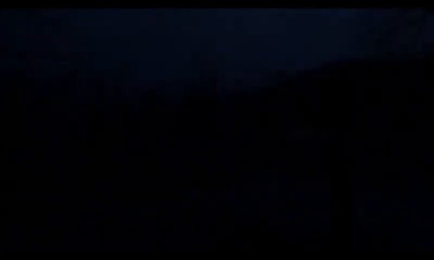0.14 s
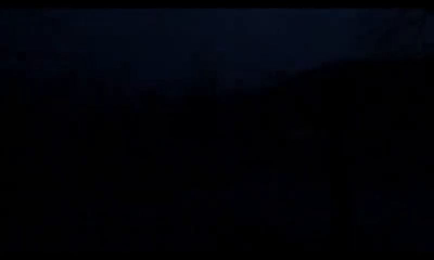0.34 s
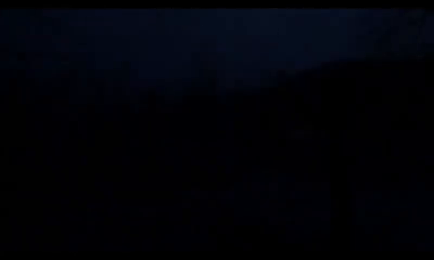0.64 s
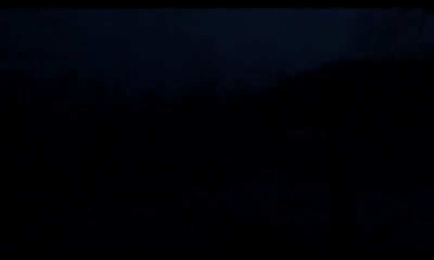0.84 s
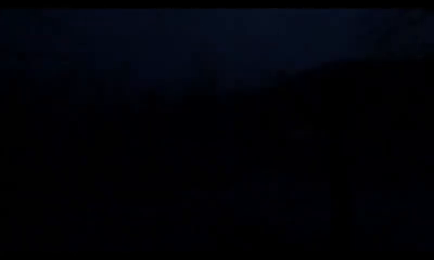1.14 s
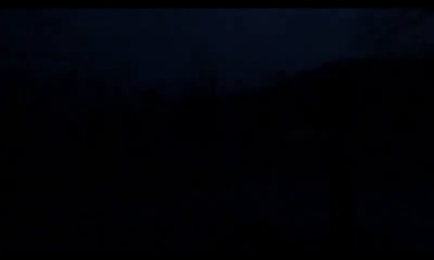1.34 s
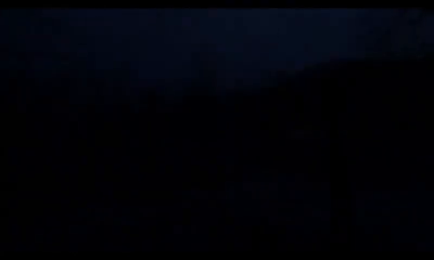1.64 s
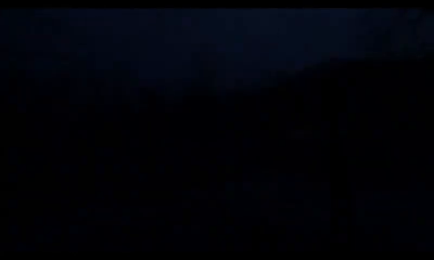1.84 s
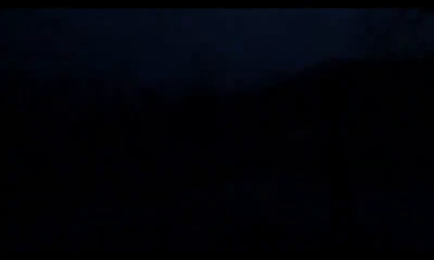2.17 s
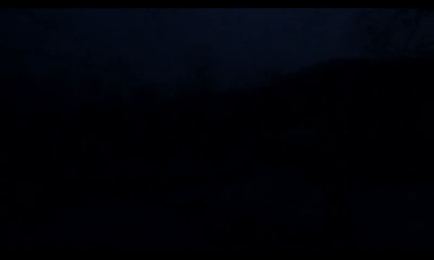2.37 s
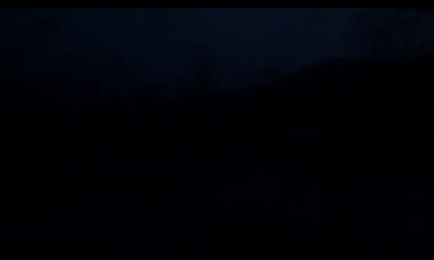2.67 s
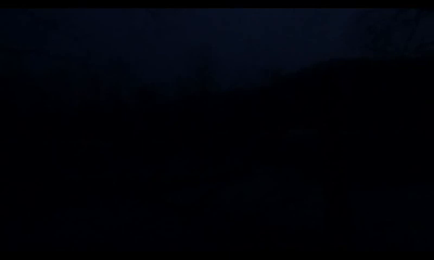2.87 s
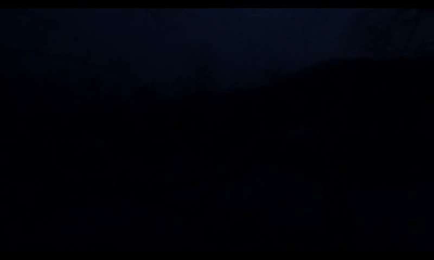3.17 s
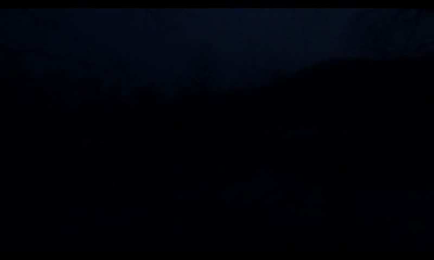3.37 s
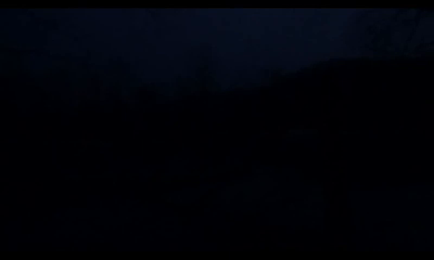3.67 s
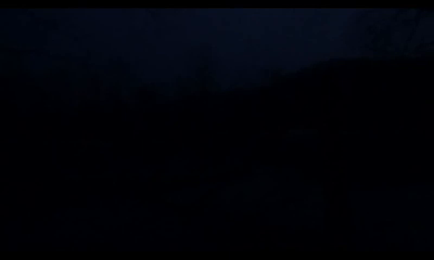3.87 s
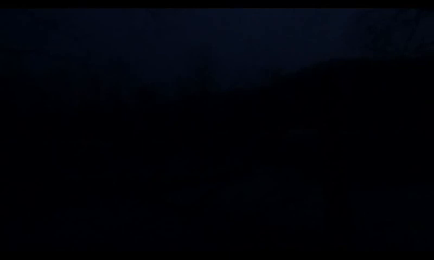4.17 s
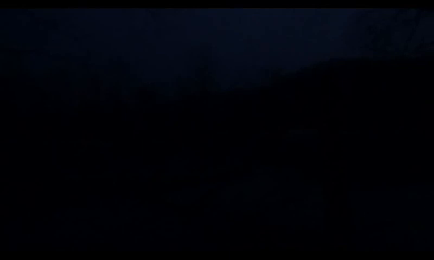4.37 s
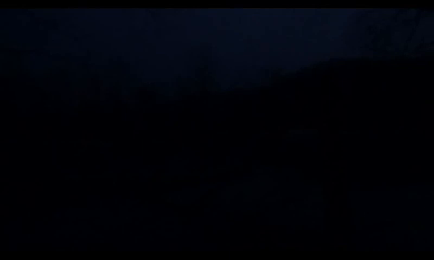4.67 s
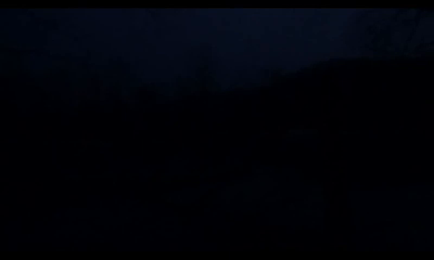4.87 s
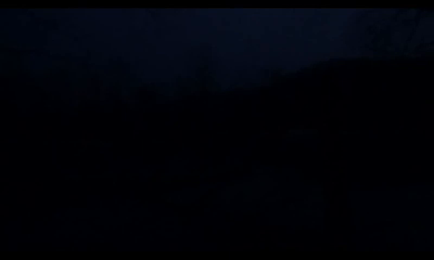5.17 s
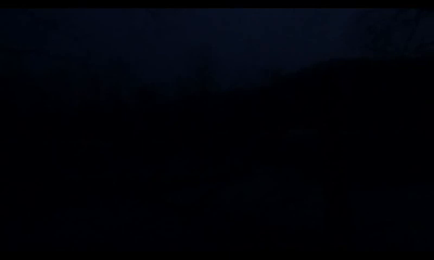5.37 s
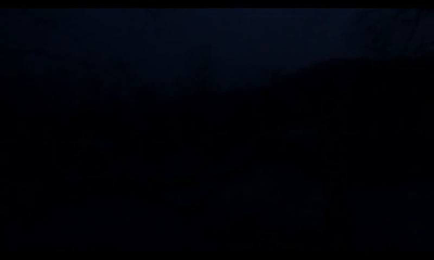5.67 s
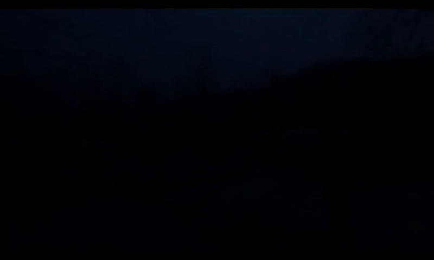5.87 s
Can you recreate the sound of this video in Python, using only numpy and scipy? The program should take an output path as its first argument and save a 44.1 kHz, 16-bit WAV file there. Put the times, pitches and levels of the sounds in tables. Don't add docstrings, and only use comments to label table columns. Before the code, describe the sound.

Dusk woods, close stereo microphone, a soft stream in front. At 0.06 s there is a soft knock, with dry leaves settling over the first half second. From about 0.4 s a loud owl, near and left, scoops into its first hoot; a second follows at 0.85, then a slurred pair from 1.3 to 1.7. After a pause with only water, single hoots come at 2.35 and 2.7, and a last slurred pair begins at 3.2, its end sliding far down until about 4.0 with a small thin afternote. Each hoot is a smooth, nearly pure arch around 470 to 650 Hz, breathy, usually led by a faint rising chirp, with a slight tail off trunks. The far quieter stream sinks under the calls and creeps back; from 4.2 to 6 s it rushes alone, gurgling, with bubbly plops, bright splash ticks and a brief swell near 4.7.

```python
import sys
import numpy as np
from scipy import signal
from scipy.fft import rfft, irfft, next_fast_len
from scipy.io import wavfile
from scipy.ndimage import uniform_filter1d

SR = 44100
rng = np.random.default_rng(int(sys.argv[2]) if len(sys.argv) > 2 else 0)


def pcm_store(signal):
    levels = np.round(np.clip(np.atleast_2d(signal), -1, 1) * 32767)
    wavfile.write(sys.argv[1], SR, levels.astype(np.int16).T)


def level_to_linear(level):
    exponent = np.asarray(level, float) / 20
    return 10 ** exponent


N = 265482

# leaves_foot_s, top_s, back_at_foot_s, top_hz
HOOT_ARCHES = [
    (0.457, 0.561, 0.643, 612),
    (0.838, 0.906, 1.029, 631),
    (1.297, 1.374, 1.512, 610),
    (1.422, 1.576, 1.69, 641),
    (2.342, 2.435, 2.557, 634),
    (2.718, 2.791, 2.933, 651),
    (3.183, 3.256, 3.401, 629),
    (3.308, 3.439, 3.625, 655),
]
# place (-1 rising foot, 0 top, 1 falling foot), level_db
ARCH_LOUDNESS = [(-1.15, -60), (-.85, -16.5), (-.66, -9.6), (-.3, -10.7), (.62, -9.5), (.72, -13.5),
                 (.79, -21), (.9, -47), (1.0, -64)]
# time_s, pitch_hz, level_db, air_db
GLIDES = [
    [(0.39, 329, -52.5, -62), (0.42, 387.7, -35.5, -61), (0.45, 450.7, -27, -60), (0.467, 492, -16, -51.5),
     (0.487, 551, -7, -58.5)],
    [(3.462, 650, -8.5, -46), (3.605, 610, -14.5, -56.5), (3.701, 586, -11, -62), (3.74, 571.3, -13, -68),
     (3.832, 535.5, -18.5, -67.5), (3.9, 468, -31.5, -73), (3.925, 414, -42.5, -72.5),
     (3.992, 345.5, -50, -65), (4.039, 286, -65, -72)],
]
# start_s, end_s, from_hz, to_hz, level_db
CHIRPS = [
    (0.337, 0.371, 545, 592, -37),
    (0.357, 0.428, 567, 690, -22),
    (0.799, 0.843, 509.2, 733, -24.5),
    (1.268, 1.305, 546, 775, -26.5),
    (2.277, 2.352, 528.7, 706.6, -26),
    (2.694, 2.723, 587.5, 719.5, -27.5),
    (3.116, 3.138, 620, 652, -41.5),
    (3.135, 3.189, 521, 728, -27),
    (3.941, 3.985, 674, 621, -37.5),
    (4.154, 4.195, 600, 529, -43),
]
# time_s, pitch_hz, level_db
AFTERNOTE = [(3.991, 624, -42), (4.033, 601, -30), (4.087, 577, -26), (4.119, 552, -33.5),
             (4.149, 476, -47)]
# start_s, end_s, from_hz, to_hz, level_db
MURMURS = [(1.415, 1.5, 712, 710, -27), (1.42, 1.495, 146, 136, -46), (1.2, 1.285, 232, 225, -55),
           (1.115, 1.16, 400, 480, -56), (.64, .675, 380, 280, -54), (1.94, 1.985, 450, 420, -60),
           (.4, .42, 2550, 2650, -50), (3.835, 3.855, 1420, 1370, -43), (3.44, 3.52, 835, 830, -42),
           (3.43, 3.53, 1485, 1480, -44), (3.43, 3.5, 2135, 2125, -50), (3.85, 3.97, 1560, 1540, -56),
           (3.895, 3.93, 700, 720, -46)]
# overtone_hz, left_db, right_db
THROAT = [(700, -8.5, -20), (958, -14.5, -39.5), (1150, -37, -49.5), (1205, -25, -40.5),
          (1610, -34.5, -49.5), (1863, -19.5, -38), (1960, -36.5, -39.5), (2200, -37.5, -51),
          (2690, -37, -41), (2750, -43, -44), (3050, -44, -56.5), (3460, -54, -56.5), (3740, -44, -52),
          (4240, -58, -56.5), (5200, -56.5, -60.5)]
# centre_hz, width_hz, level_db, left_over_right_db
AIR = [(615, 190, 13.5, 9.5), (835.5, 30, -6.5, 18), (1560, 330, 2, 14), (2150, 680, -0.5, 18.5),
       (2884, 45, 1.5, 3.5), (3040, 1400, -1.5, 7), (4360, 45, -8.5, 4.5), (5330, 2100, -1, 3),
       (8800, 2000, -0.5, -3), (238, 360, -8, -0.5)]
# freq_hz, density_db (per Hz)
STREAM_COLOUR = [(20, -13.5), (60, -17), (245, -13), (370, -8), (480, -4), (640, -5.5), (1270, 0),
                 (1800, -4), (2950, -11), (6000, -14), (7060, -18.5), (9200, -9), (10600, -16.5),
                 (11600, -29.5)]
# freq_hz, likeness (0 to 1)
STREAM_LIKENESS = [(60, 0.7), (170, 0.94), (490, 0.83), (1410, 0.82), (4060, 0.5), (11600, 0.72)]
# time_s, peak_db, pitch_hz
PLOPS = [(1.097, -43.5, 1560), (1.207, -34.5, 1570), (2.064, -46.5, 1710), (2.237, -52, 1090),
         (2.336, -37, 922), (3.088, -48.5, 1058), (4.244, -42, 2100), (4.268, -43, 1262), (4.351, -45, 830),
         (4.703, -39.5, 1310), (4.747, -41, 1660), (4.886, -42, 1439), (5.146, -39.5, 1520),
         (5.244, -34, 1730), (5.334, -46, 1000), (5.479, -56, 1250), (5.692, -33.5, 1283),
         (5.747, -54, 1714), (5.961, -39, 2150)]
# time_s, peak_db, pitch_hz
TICKS = [(0.2433, -30, 8950), (0.3623, -23, 2820), (0.4559, -25.5, 2860), (0.6539, -55, 3300),
         (0.706, -29, 3050), (0.7758, -32, 5200), (1.2047, -32, 2750), (1.787, -39, 3350),
         (2.065, -32, 8830), (2.077, -28, 10170), (2.299, -35, 3570), (2.3197, -31.5, 5330),
         (2.576, -35.5, 3668), (3.031, -58, 3440), (3.9849, -35.5, 5367), (4.141, -28, 9120),
         (4.366, -36, 7640), (4.7358, -34, 4945), (4.8099, -27.5, 8850), (5.1622, -28, 8600),
         (5.2235, -29, 9350), (5.2809, -29, 8900), (5.329, -33, 3050), (5.4264, -31.5, 6030),
         (5.4465, -37, 4850), (5.6846, -29, 3040), (5.8417, -35, 4370), (5.9618, -36.5, 3010)]
# time_s, peak_db, pitch_hz
KNOCK = (.0612, -24, 700)
# time_s, rise_db
SURGES = [
    (4.7, 4.5),
    (5.17, 1.4),
    (0.85, 3),
]

FOOT_HZ = 470
ROUND_UP, ROUND_DOWN = 0.82, 0.95
LET_GO_PLACE, LET_GO_HZ = 0.74, 250.7
SLUR_DB = -10.5
CATCH_HZ, CATCH_WIDTH_HZ, CATCH_DB_PER_HZ = 604, 15, 0.11
AIR_TOP_DB, AIR_TOP_HZ, AIR_DB_PER_HZ = -48, 658.6, 0.13
CHIRP_ATTACK, CHIRP_RELEASE = 0.37, 0.22
CHIRP_EDGE_DB, CHIRP_DIP_DB = -22, -5
GAIN_FULL_DB, GAIN_LOW_DB = -46, -56.5
GAIN_SINK_S, GAIN_BACK_DB_PER_S = 0.32, 3.5
SURGE_RISE_S, SURGE_FALL_S = 0.04, 0.12
RUSTLE_DB, RUSTLE_HOLD_S, RUSTLE_DB_PER_S, RUSTLE_REST_DB = -53, 0.14, 70.5, -75.5
LIMIT_DB, TOP_HZ = -2.0, 11750


def owl():
    hz, phase, (level, air_gain) = voice(hoots())
    level = np.sqrt(2) * level * level_to_linear(0.8)
    effort = np.abs(air_gain) / level_to_linear(-57.0)
    out = hoot_tone(hz, phase, level, effort) + breath(phase, level, air_gain)
    _, phase, (level,) = voice(chirps())
    out += panned(np.sqrt(2) * level * np.sin(phase), 5.0)
    return out + murmurs()


def hoot_tone(hz, phase, level, effort):
    lean_db = 5.0 + 4.8 * np.clip(level / 0.4, 0, 1)
    late = np.interp(hz, [570, 650], [0.1, 0.45])
    out = panned(level, lean_db) * np.sin([phase - late, phase])
    for k in range(2, 9):
        shiver = 0.15 * (k - 2) ** 1.5 * drift(50)
        strength = level_to_linear([at_hz(THROAT, k * hz, axis=1), at_hz(THROAT, k * hz, axis=2)])
        push = effort ** (0.15 * (k - 2) + 0.11)
        waver = level_to_linear((0.67 + 0.6 * k) * drift(25))
        shift = np.array([[0], [1.6 * (k > 2)]])
        out += level * strength * push * waver * np.sin(k * phase + shift + shiver)
    cavity = np.exp(-((7 * hz - 4300) / 60) ** 2)
    return out + level * level_to_linear(-43.0) * cavity * np.sin(7 * phase)


def breath(phase, level, air_gain):
    out = np.zeros((2, N))
    puffs = 1 + 0.12 * np.cos(phase)
    for centre_hz, width_hz, db, pan_db in AIR:
        r, w = np.exp(-np.pi * width_hz / SR), 2 * np.pi * centre_hz / SR
        b, a = [1, 0, -1], [1, -2 * r * np.cos(w), r * r]
        white = rng.standard_normal((3, N))
        shared = (0.5 + centre_hz / 9000 + 150 / centre_hz) * white[0]
        band = signal.lfilter(b, a, shared + 0.93 * white[1:])
        band = rms_one(signal.lfilter(b, a, band))
        with_tone = level_to_linear(-52.0) * np.sqrt(np.abs(level)) * (centre_hz < 2000)
        gain = (air_gain + with_tone) * level_to_linear(db + 2.0 * drift(45))
        out += panned(gain * puffs, pan_db) * band
    return out


def murmurs():
    out = np.zeros((2, N))
    for start, end, from_hz, to_hz, db in MURMURS:
        at, t = round(start * SR), np.arange(round((end - start) * SR)) / SR
        mean_hz = from_hz + (to_hz - from_hz) * t / (2 * t[-1])
        tone = np.hanning(len(t)) ** 0.5 * np.sin(2 * np.pi * mean_hz * t)
        out[:, at:at + len(t)] += panned(level_to_linear(db) * tone, 10.0)
    return out


def hoots():
    s = np.arange(0, N / SR, 0.002)
    start, top, end, top_hz = np.transpose(HOOT_ARCHES)[:, :, None]
    place = np.where(s < top, (s - top) / (top - start), (s - top) / (end - top))
    place = np.clip(place, -1.5, 1.5)
    round_share = np.where(place < 0, ROUND_UP, ROUND_DOWN)
    drop = round_share * place ** 2 + (1 - round_share) * np.abs(place) ** 5
    arch_hz = top_hz - (top_hz - FOOT_HZ) * drop
    arch_hz -= LET_GO_HZ * np.maximum(place - LET_GO_PLACE, 0)
    catch_db = (place > 0) * CATCH_DB_PER_HZ * np.maximum(top_hz - CATCH_HZ, 0)
    catch_db = catch_db * np.exp(-((arch_hz - CATCH_HZ) / CATCH_WIDTH_HZ) ** 2)
    arch_db = np.interp(place, *np.transpose(ARCH_LOUDNESS), left=-99, right=-99) - catch_db
    hz, level_db = arch_hz.max(axis=0), arch_db.max(axis=0)
    slurred = (np.abs(place) < 0.85).sum(axis=0) > 1
    level_db = np.where(slurred, SLUR_DB, level_db)
    rows = np.transpose([s, hz, level_db, AIR_TOP_DB + AIR_DB_PER_HZ * (hz - AIR_TOP_HZ)])
    for glide in GLIDES:
        times, *columns = np.transpose(glide)
        inside = (s >= times[0]) & (s < times[-1])
        rows[inside, 1:] = np.transpose([np.interp(s[inside], times, c) for c in columns])
    rows = rows[(rows[:, 2] > -90) & (s < GLIDES[-1][-1][0])]
    return np.split(rows, np.flatnonzero(np.diff(rows[:, 0]) > 0.003) + 1)


def chirps():
    middle = (1 + CHIRP_ATTACK - CHIRP_RELEASE) / 2
    share = np.array([0, CHIRP_ATTACK, middle, 1 - CHIRP_RELEASE, 1])
    shape_db = np.array([CHIRP_EDGE_DB, 0, CHIRP_DIP_DB, 0, CHIRP_EDGE_DB])
    rows = [np.transpose([start + (end - start) * share, from_hz + (to_hz - from_hz) * share, db + shape_db])
            for start, end, from_hz, to_hz, db in CHIRPS]
    return rows[:-1] + [np.array(AFTERNOTE)] + rows[-1:]


def voice(notes, fade_s=0.019):
    rows = np.concatenate(notes)
    sounding = sum(in_time([n[0][0] - fade_s, n[0][0], n[-1][0], n[-1][0] + fade_s], [0, 1, 1, 0])
                   for n in notes)
    sounding = np.minimum(sounding, 1)
    hz = uniform_filter1d(in_time(rows[:, 0], rows[:, 1]), size=700)
    gains = [uniform_filter1d(sounding * level_to_linear(in_time(rows[:, 0], c)), size=130) for c in rows[:, 2:].T]
    return hz, 2 * np.pi * np.cumsum(hz) / SR, gains


def woods(x):
    t = np.arange(2 * SR) / SR
    white = rng.standard_normal((3, len(t)))
    fall = level_to_linear(-51.5 - 60 * t / 0.28) + level_to_linear(-77.5 - 60 * t / 2.2)
    onset = np.clip(t / 0.03, 0, 1) ** 2
    tail = fall * onset * (0.81 * white[0] + 0.5 * white[1:])
    x = x + 0.88 * signal.sosfilt(signal.butter(1, [595, 640], "band", fs=SR, output="sos"), x)
    return signal.fftconvolve(x[None], tail, axes=1)[:, :N]


def stream():
    flow = rush(patchy_db=3.5, crackle_db=-4) + level_to_linear(-9.5) * grains(360, 560, 2200, 25.0, 3.7)
    flow += level_to_linear(-14.0) * grains(60, 590, 670, 30.0, 3.3)
    ticks = drops(TICKS, 20.0, -6.0) + drops(TICKS, 3.0, -5.0)
    ticks = signal.sosfilt(signal.butter(2, 900, "high", fs=SR, output="sos"), ticks)
    knock = drops([KNOCK], 2.5, 0) + drops([(KNOCK[0], KNOCK[1], 2100)], 8.0, -9)
    return recorder_gain() * flow + drops(PLOPS, 52.0, -0.88) + ticks + knock


def rush(patchy_db, crackle_db):
    out, together = 0, drift(8)
    edges = 22 * 2 ** np.arange(0, 9.2, 1 / 3)
    white = rng.standard_normal((2, 2, N))
    for k, (low, high) in enumerate(zip(edges, edges[1:])):
        mid, side = signal.sosfilt(signal.butter(2, [low, high], "band", fs=SR, output="sos"), white[k % 2])
        alike = np.clip(at_hz(STREAM_LIKENESS, np.sqrt(low * high)) + 0.073, 0, 1)
        flicker = 0.45 * together + drift(40)
        gain = level_to_linear(patchy_db * (800 / max(low, 800)) ** 0.22 * flicker)
        out = out + gain * (np.sqrt(1 + alike) * mid + np.sqrt(1 - alike) * side * [[1], [-1]])
    out = rms_one(out) + level_to_linear(crackle_db) * grains(600, 2580, 13000, 9.4, 3.9)
    colour = level_to_linear(at_hz(STREAM_COLOUR, np.linspace(1, SR / 2, N // 2 + 1)))
    return rms_one(irfft(rfft(out) * colour, N))


def grains(per_s, low_hz, high_hz, cycles, spread_db):
    sizes = level_to_linear(spread_db * np.minimum(rng.exponential(1, N), 3.5)) * rng.choice([-1, 1], N)
    born = rng.random(N) < per_s * level_to_linear(3.0 * drift(8)) / SR
    dealt = rng.integers(0, 16, N)
    rings = sum(ring(sizes * born * (dealt == k), hz, cycles / hz)
                for k, hz in enumerate(np.geomspace(low_hz, high_hz, 16)))
    return rms_one(signal.sosfilt(signal.butter(4, 0.85 * low_hz, "high", fs=SR, output="sos"), rings))


def drops(rows, cycles, db):
    out = np.zeros(N)
    click = np.arange(4000) == 0
    for s, peak_db, hz in rows:
        at = round(s * SR)
        out[at:at + 4000] += ring(level_to_linear(peak_db + db) * click, hz, cycles / hz)[:N - at]
    return out


def recorder_gain():
    step_s = 0.01
    s = np.arange(0, N / SR + step_s, step_s)
    loud = np.any([(s > start) & (s < end) for start, _, end, _ in HOOT_ARCHES], axis=0)
    loud = loud | ((s > GLIDES[1][0][0]) & (s < GLIDES[1][4][0]))
    db = [GAIN_FULL_DB]
    for pulled in loud[1:]:
        if pulled:
            db.append(db[-1] + (GAIN_LOW_DB - db[-1]) * step_s / GAIN_SINK_S)
        else:
            db.append(min(db[-1] + step_s * GAIN_BACK_DB_PER_S, GAIN_FULL_DB))
    swell = sum(rise_db * np.interp(s, [at - SURGE_RISE_S, at, at + SURGE_FALL_S], [0, 1, 0])
                for at, rise_db in SURGES)
    return level_to_linear(in_time(s, db + swell))


def leaves():
    white = rng.standard_normal((3, N))
    bright = signal.butter(2, [1500, 6500], "band", fs=SR, output="sos")
    hiss = signal.sosfilt(bright, white[0] + 0.4 * white[1:])
    breeze = signal.sosfilt(signal.butter(2, [30, 110], "band", fs=SR, output="sos"), white[1:])
    settling_s = np.maximum(np.arange(N) / SR - RUSTLE_HOLD_S, 0)
    rustle_db = np.maximum(RUSTLE_DB - RUSTLE_DB_PER_S * settling_s, RUSTLE_REST_DB)
    rustle = rms_one(hiss) * level_to_linear(rustle_db + 4.0 * drift(27))
    return rustle + rms_one(breeze) * level_to_linear(-81.0 + 2.9 * drift(4))


def in_time(s, values):
    return np.interp(np.arange(N) / SR, s, values)


def at_hz(points, hz, axis=1):
    points = np.array(points)
    return np.interp(np.log(hz), np.log(points[:, 0]), points[:, axis])


def rms_one(x):
    return x / np.sqrt(np.mean(x ** 2) + 1e-20)


def drift(rate):
    r = np.exp(-80 * np.pi * rate / SR)
    slow = signal.lfilter([1], [1, -2 * r, r * r], rng.standard_normal(N // 40 + 2002))[2000:]
    return np.interp(np.arange(N) / 40, np.arange(len(slow)), rms_one(slow))


def ring(clicks, hz, t60):
    r, w = level_to_linear(-60 / (t60 * SR)), 2 * np.pi * hz / SR
    return signal.lfilter([0, np.sin(w)], [1, -2 * r * np.cos(w), r * r], clicks + 1e-18)


def panned(x, db):
    left = 2 / (1 + level_to_linear(-db))
    return np.array([x * left, x * (2 - left)])


def scene():
    call = signal.sosfilt(signal.butter(2, 70, "high", fs=SR, output="sos"), owl())
    thrown = signal.sosfilt(signal.butter(2, 620, "high", fs=SR, output="sos"), call.mean(axis=0))
    return call + woods(thrown) + stream() + leaves()


def top_cut(x):
    return signal.sosfilt(signal.butter(12, 12230, fs=SR, output="sos"), x)


def record(dry):
    envelope = np.abs(signal.hilbert(dry[0], next_fast_len(N))[:N])
    size = uniform_filter1d(envelope, size=130)
    held = dry / (1 + (size / level_to_linear(LIMIT_DB)) ** 6) ** (1 / 6)
    steep = signal.cheby2(20, 80, TOP_HZ, fs=SR, output="sos")
    return top_cut(signal.sosfilt(steep, held))


dry = scene()
out = record(dry)
pcm_store(out)
```